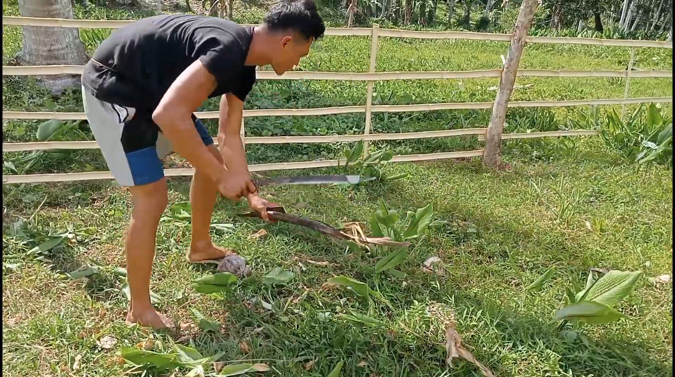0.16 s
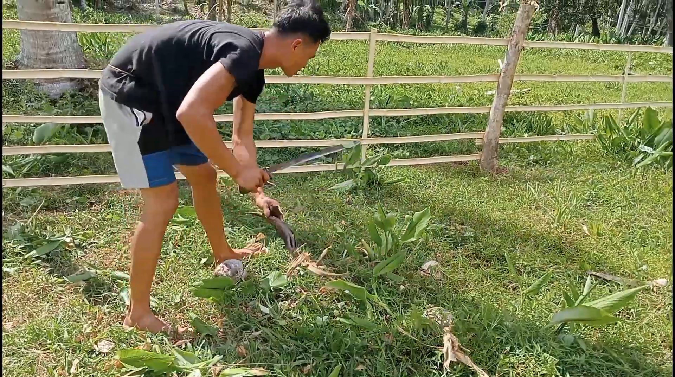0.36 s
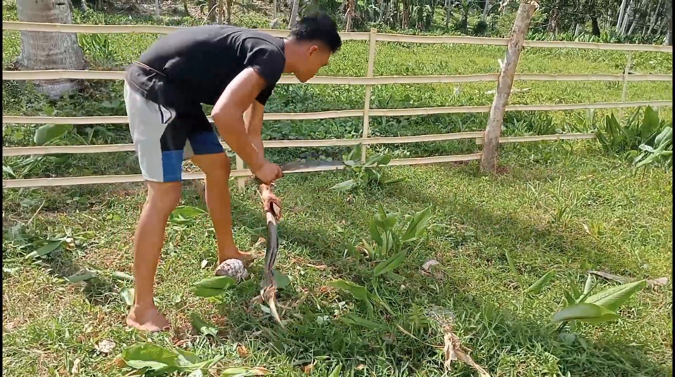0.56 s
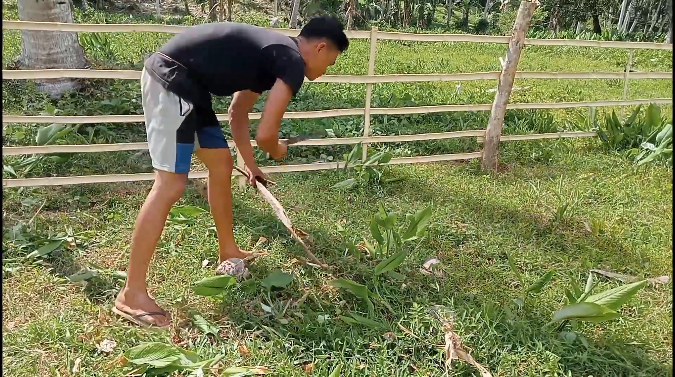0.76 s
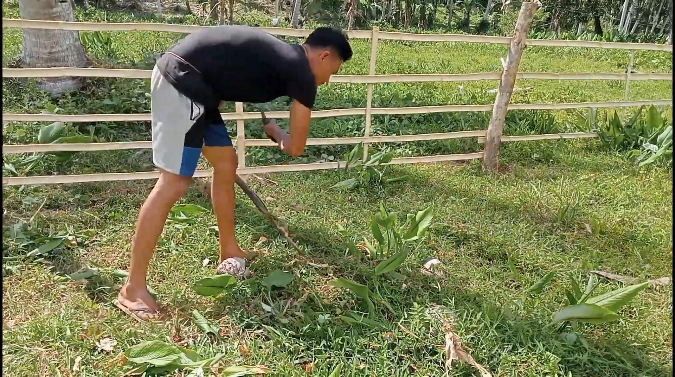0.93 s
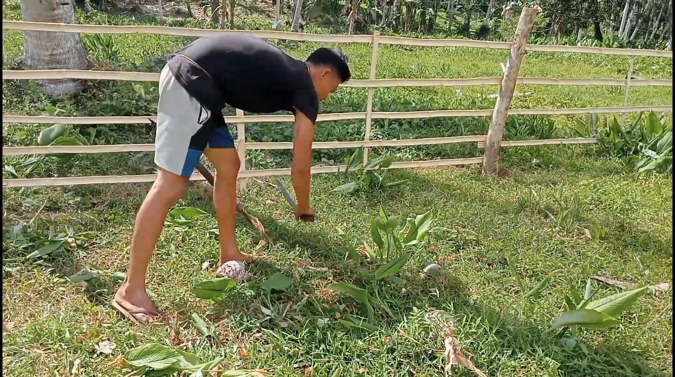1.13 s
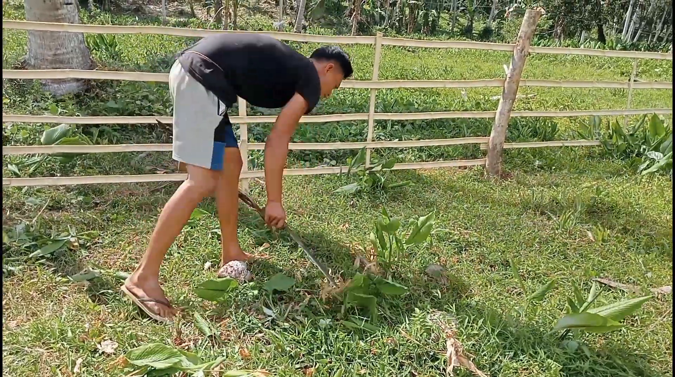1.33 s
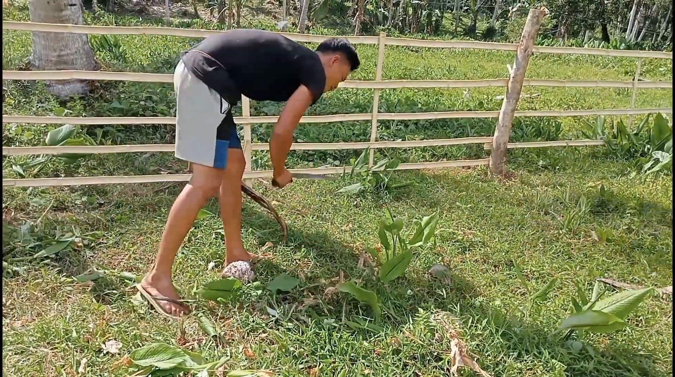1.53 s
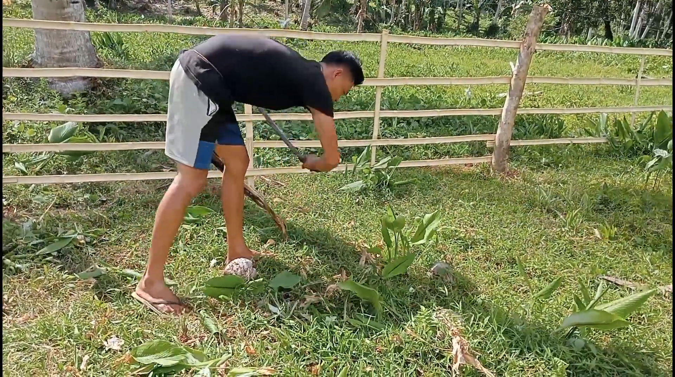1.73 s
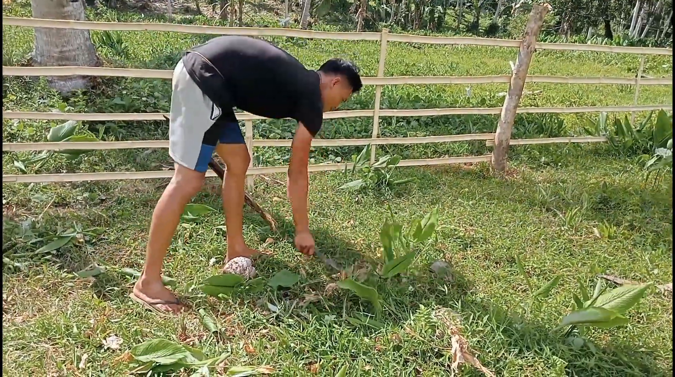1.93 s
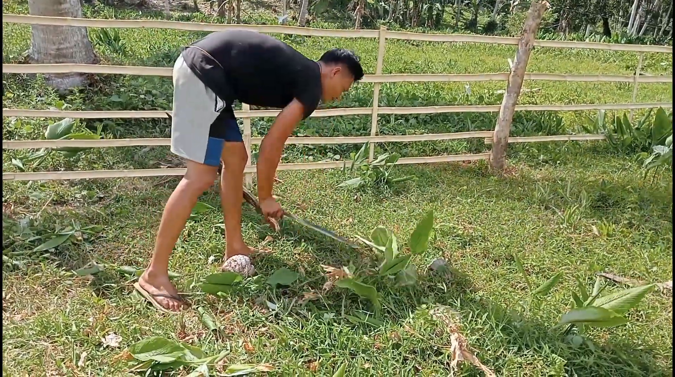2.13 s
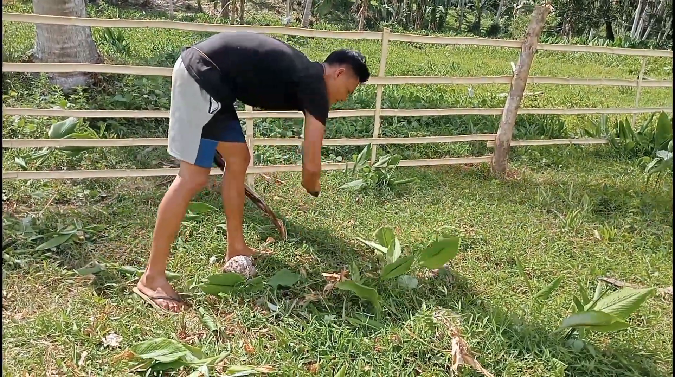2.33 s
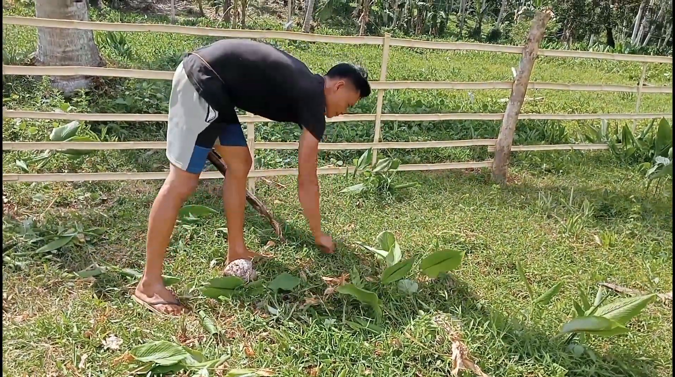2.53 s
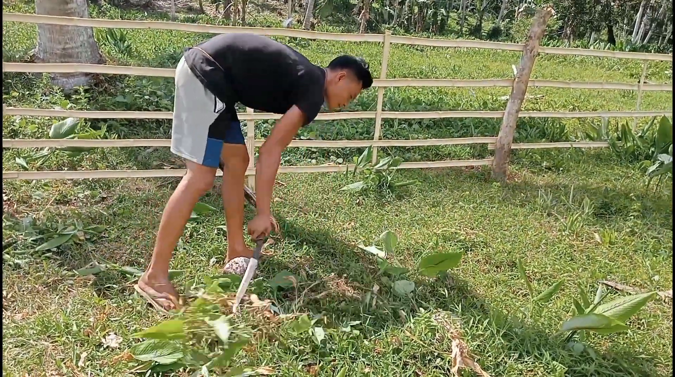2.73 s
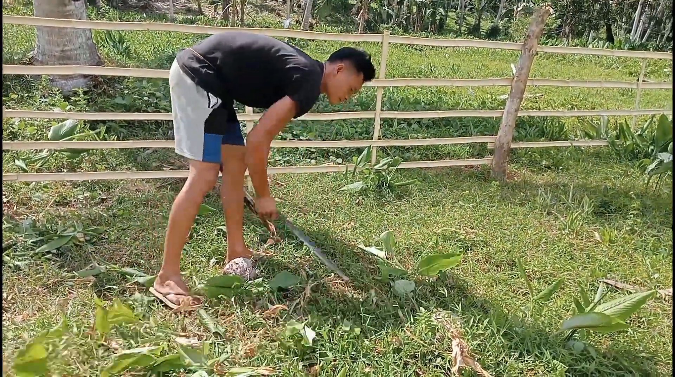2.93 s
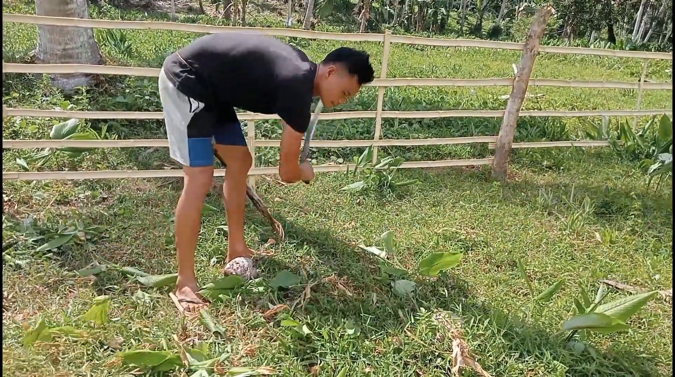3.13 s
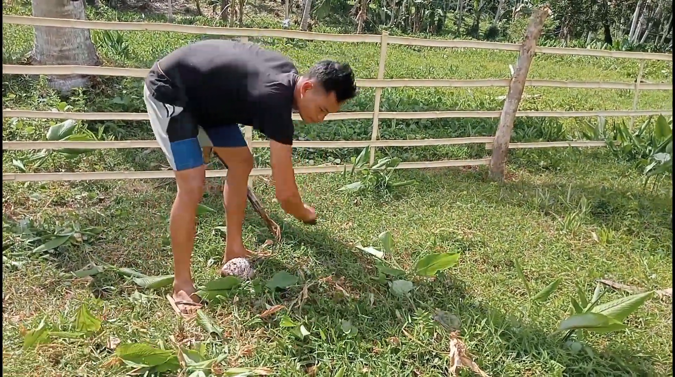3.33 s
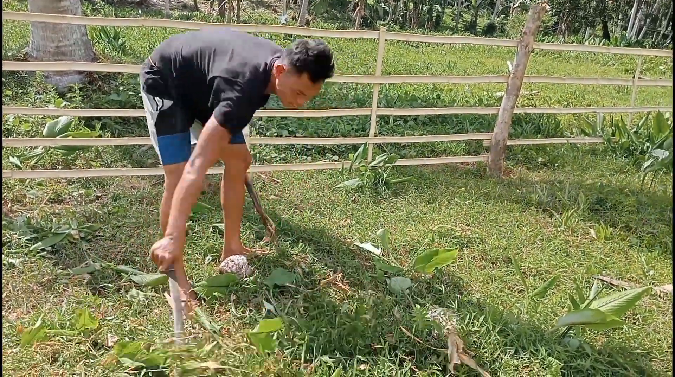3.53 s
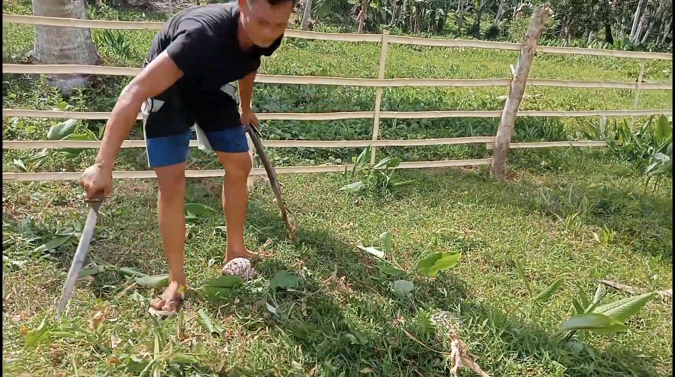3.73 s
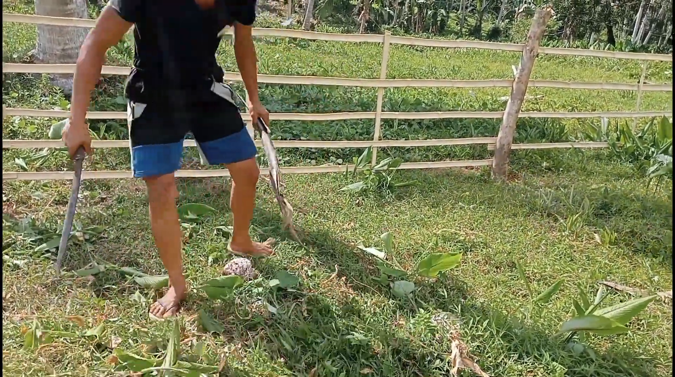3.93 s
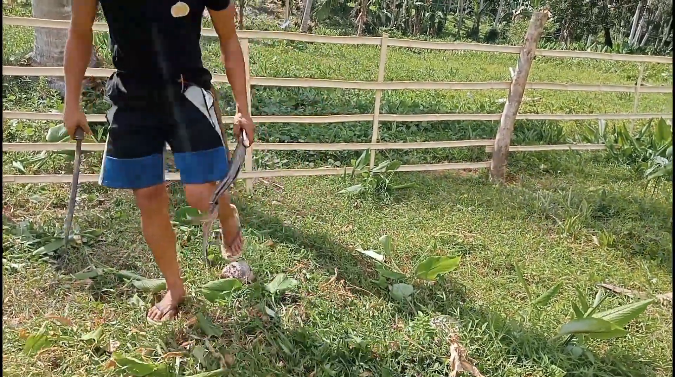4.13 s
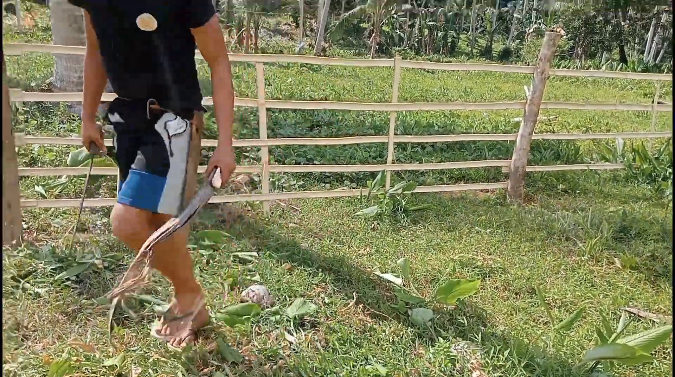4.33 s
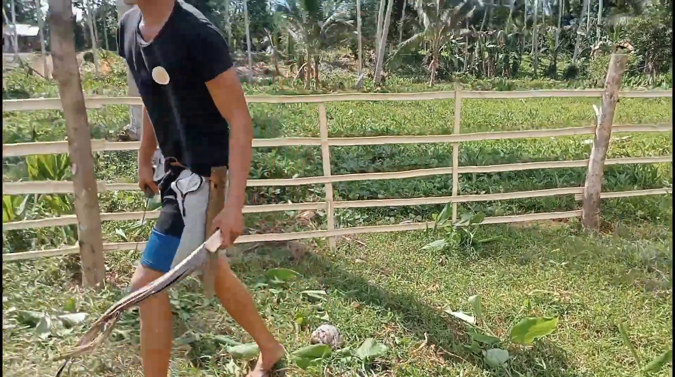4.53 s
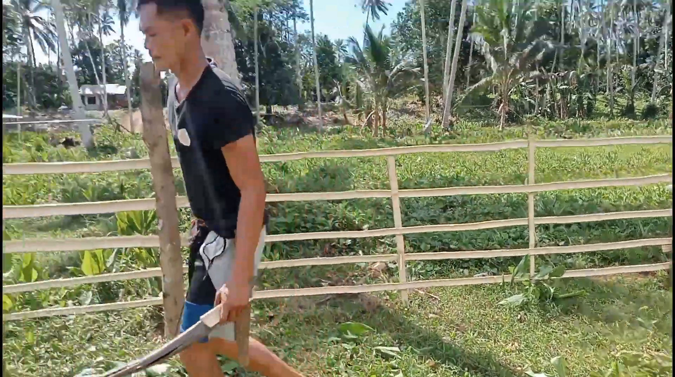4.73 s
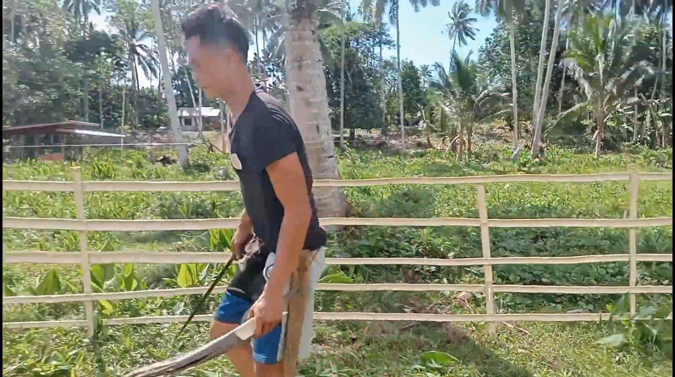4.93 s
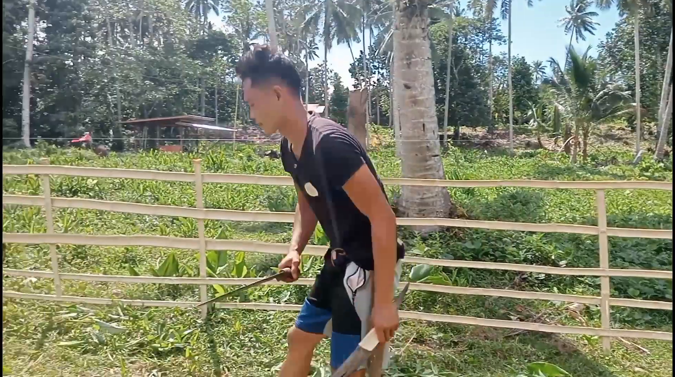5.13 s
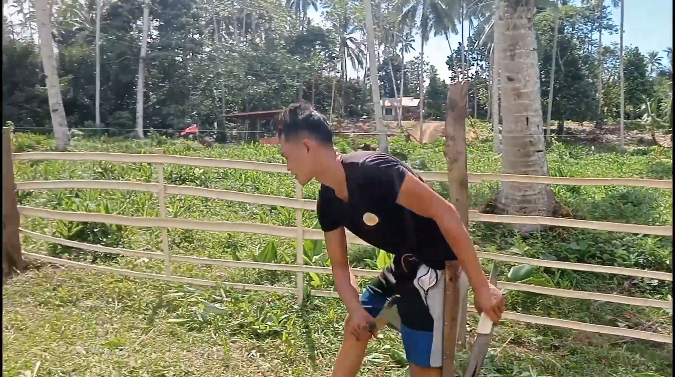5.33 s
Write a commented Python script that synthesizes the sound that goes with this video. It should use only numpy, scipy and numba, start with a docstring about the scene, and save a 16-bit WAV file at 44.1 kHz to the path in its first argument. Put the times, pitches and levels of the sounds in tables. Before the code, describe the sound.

Outdoors in an open grassy field, a phone microphone close by is buffeted by low wind. After light rustles and twig snaps, a bush knife slashes weeds three times, loud and crisp, with cut leaves pattering down. The blade tinks twice faintly, a fourth slash follows, then quieter snaps and leafy steps. Thin birds whistle far off and foliage hisses.

```python
"""Wind buffets a nearby microphone, foliage hisses, leaves stir and small birds whistle faintly throughout.
Twigs snap, then a long bush knife slashes weeds near 1.3, 2.1 and 2.7 s; its blade tinks twice near 3 s.
A fourth slash comes near 3.6 s, followed by more snaps. Cut leaves rustle down after every swing.
Noise bursts make tearing, snaps and thuds; sines make tinks and birds; crackle makes the leaves;
low-passed noise and pressure dips make the wind; coloured noise makes the far foliage."""
import sys
import numpy as np
from scipy import signal
from scipy.fft import rfft, irfft
from scipy.io import wavfile
from scipy.ndimage import uniform_filter1d
from numba import njit

SR = 44100
rng = np.random.default_rng(int(sys.argv[2]) if len(sys.argv) > 2 else 0)


def volts(x):
    """Linear amplitude factor 10**(x/20) for a level x in dB, scalar or array-like."""
    e = np.asarray(x, float) / 20
    return 10 ** e


def file_out(sig):
    """Save sig as 16-bit WAV at sys.argv[1]."""
    # one column per channel
    cols = np.atleast_2d(sig).T
    # limit, then scale
    lim = np.clip(cols, -1, 1)
    pcm = np.round(lim * 32767).astype(np.int16)
    wavfile.write(sys.argv[1], SR, pcm)


N = 237431
T = np.arange(N) / SR


# stems torn by the blade: start_s, level_db, tilt_db_per_octave, ring_hz, thud_db (against the tearing), t60_s
STEM_CUTS = [(1.3435, -16, 0.2, 4960, -33, 0.34), (1.354, -4.5, 2.2, 7000, -26, 0.087),
             (1.358, -3, 2.5, 5030, -22.5, 0.082), (1.3663, -4, 3.5, 9400, -13.5, 0.11),
             (1.401, -16, -1, 3280, -17, 0.17), (2.0853, -14, 2, 4020, -32, 0.11),
             (2.0912, -2, 1.5, 7600, -28, 0.049), (2.0963, -2, -0.5, 4930, -19.5, 0.038),
             (2.102, -10.5, 4.5, 4970, -30, 0.19), (2.7405, -18, -3, 5400, -11, 0.56),
             (2.7506, -1.5, -1.3, 3470, -21, 0.042), (2.755, -10, 7, 4500, -20, 0.044),
             (2.766, -6.5, 7, 8550, -12, 0.24), (2.771, -10, -1, 2000, -22, 0.19),
             (2.7797, -3.5, 0, 3900, -15, 0.074), (2.7883, -9, -4.5, 3000, -19, 0.092),
             (2.797, -11, 2.3, 1510, -9, 0.21), (3.588, -12, 1, 9000, -41, .05),
             (3.5907, -7.5, -0.3, 12400, -17, 0.21), (3.6065, -4.5, -1.5, 8900, -8.5, 0.12),
             (3.616, -5.5, 7, 9000, -21, 0.13), (3.623, -10.5, -1, 5000, -8, 0.15),
             (3.644, -20.5, .6, 5030, -5.5, 0.1)]
# colour of tearing fibres: pitch_hz, level_db (per Hz)
TEARING_COLOUR = [(290, -19), (500, -14), (988, -8), (1400, 2), (1720, -14.5), (1980, 0), (2980, -1),
                  (3440, 1), (9220, -1), (12500, -6), (14900, -4.5), (16000, -1.5)]
# thud of a thick stem: pitch_hz, width_hz, level_db
STEM_MODES = [(264, 150, -2), (380, 140, 8.5), (730, 210, 7.5), (1350, 370, 0), (1900, 220, -1)]
# bending modes of the blade, also played by tinks(): pitch_hz, level_db, t60_s
BLADE_MODES = [(3350, -23, 0.024), (4180, -6.5, 0.027), (4760, -3, 0.067), (5870, -21, 0.016),
               (6790, 1, 0.04), (7860, 3.5, 0.04), (8800, 4.5, 0.019), (9730, -6, 0.023)]


def slashes():
    """Each cut is a burst of tearing fibres, ringing round one pitch, over the short thud of the stem."""
    out, t = np.zeros(N), T[:SR // 4]
    rise = 1 - np.exp(-t / 0.00072)
    for start_s, level_db, tilt_db, ring_hz, thud_db, t60_s in STEM_CUTS:
        grains = crackle(len(t), spread_db=2.5)
        fibres = colour(grains, TEARING_COLOUR, tilt_db)
        fibres = fibres + 1.4 * band(fibres, ring_hz, 0.3 * ring_hz)
        fibres = patchy(fibres, 400, spread_db=1.3)
        # the tearing shakes the blade, which colours the burst with its own modes
        shaken_blade = sum(band(fibres, hz, 8 / blade_t60_s) for hz, _, blade_t60_s in BLADE_MODES)
        fibres = unit(fibres + 0.17 * shaken_blade)
        tearing = fibres * volts(-60 * t / t60_s) / 3
        blow = grains * volts(-60 * t / 0.054)
        thud = sum(volts(mode_db) * band(blow, hz, width_hz) for hz, width_hz, mode_db in STEM_MODES)
        thud = volts(thud_db) * thud / np.abs(thud).max()
        add(out, start_s, volts(level_db) * rise * (tearing + thud))
    return out


# blade touched: start_s, peak_db, tilt_db_per_octave
BLADE_TOUCHES = [(2.9485, -26, -5), (3.045, -13.5, 12)]


def tinks():
    """The hand-held blade rings briefly on its bending modes."""
    out, t = np.zeros(N), T[:SR // 10]
    for start_s, peak_db, tilt_db in BLADE_TOUCHES:
        ring = 0
        for hz, mode_db, t60_s in BLADE_MODES:
            tilted_db = mode_db + tilt_db * np.log2(hz / 8000)
            ring = ring + volts(tilted_db - 60 * t / t60_s) * np.sin(2 * np.pi * hz * t)
        add(out, start_s, volts(peak_db) * ring / np.abs(ring).max())
    return out


# colour of the leaves: pitch_hz, level_db (per Hz)
LEAF_COLOUR = [(410, -38), (700, -4), (910, -8), (1330, -2.5), (1820, -7.5), (2490, -4), (6650, -3.5),
               (15000, -10.5), (16000, -3)]
# leaves and grass stirred or trodden: start_s, length_s, level_db, treble_db (added above 4 kHz, taken below)
LEAF_STIRS = [(0.01, 0.12, -58, 4), (0.166, 0.093, -52.5, -4.5), (0.395, 0.16, -52.5, -0.5),
              (0.528, 0.024, -46.5, -2.5), (.67, .03, -44.5, -2.5), (0.854, .06, -49, .6),
              (.94, 0.043, -46, 1.5), (1.103, 0.17, -51, -4.5), (1.87, 0.054, -48.5, -2),
              (2.02, 0.017, -48, -5), (2.36, 0.076, -45.5, -4.5), (2.64, 0.037, -59, -12),
              (2.968, 0.14, -42, 1.2), (3.144, 0.073, -47.5, .6), (3.256, 0.045, -51, -5.5),
              (3.395, .07, -54, -8), (3.885, 0.15, -45.5, -0.5), (4.097, 0.079, -45.5, -0.5),
              (4.286, 0.025, -45.5, -2.5), (4.624, 0.09, -41, 0.6), (4.924, .07, -49.5, -0.5),
              (5.235, 0.065, -51, 2.5)]
# cut leaves falling after each swing: start_s, level_db, t60_s, treble_db (added above 4 kHz, taken below)
LEAF_FALLS = [(1.4, -32, 0.61, .3), (2.12, -31.5, .3, 2), (2.81, -34, 0.68, 0), (3.65, -38, 0.99, 2.5)]


def rustle():
    """Patchy crackle of many leaves, swelling when they are stirred and dying away as cut ones fall."""
    rise_db_per_s, fade_db_per_s, still_db = 402, 210, -57.5
    # single leaves crack above the rustle
    fleck_shape = volts(3.5 - 60 * T[:SR // 20] / 0.0094)
    flecks = signal.fftconvolve(scatter(90, spread_db=7), fleck_shape)[:N]
    grains = crackle(N, spread_db=3.0) * (volts(0.43 * walk(200)) + flecks)
    leaves = patchy(colour(grains, LEAF_COLOUR), 70, spread_db=2.5)
    low = signal.sosfilt(signal.butter(2, 4000, fs=SR, output="sos"), leaves)
    high = leaves - low

    moves = [(still_db + 2.5 * walk(16), 0)]
    for start_s, length_s, level_db, treble_db in LEAF_STIRS:
        moves.append((held_db(start_s, length_s, level_db, rise_db_per_s, fade_db_per_s), treble_db))
    for start_s, level_db, t60_s, treble_db in LEAF_FALLS:
        moves.append((held_db(start_s, 0, level_db, rise_db_per_s, 60 / t60_s), treble_db))

    def gain(sign):
        """Add the powers of all movements, for the low (-1) or high (1) half."""
        return np.sqrt(sum(volts(2 * (db + sign * treble_db)) for db, treble_db in moves))

    return low * gain(-1) + high * gain(1)


# twig snaps: start_s, peak_db, pitch_hz (centre)
TWIG_SNAPS = [(0.6559, -33, 6900), (0.6802, -18, 8700), (0.688, -28, 8300), (1.7913, -33, 5170),
              (2.0291, -27, 9500), (2.383, -25, 9000), (3.6687, -26, 9480), (3.8877, -27, 1700),
              (3.932, -31, 3410), (3.9918, -30, 5990), (4.1322, -30.5, 1980), (4.2377, -24.5, 7030),
              (4.2869, -19.5, 5730), (4.3105, -24.5, 9820), (4.927, -29.5, 2410), (4.938, -35, 2100),
              (4.9941, -28.5, 6500), (5.0064, -35, 5020)]


def snaps():
    """A click, its bounce off the ground and a few after-crackles, heard through a broad resonance."""
    out, t = np.zeros(N), T[:SR // 10]
    for start_s, peak_db, hz in TWIG_SNAPS:
        burst = 0.16 * rng.standard_normal(len(t)) * volts(-60 * t / 0.015)
        burst[0] = 1
        burst[int(.001 * SR)] = -.4  # the bounce
        snap = band(band(burst, hz, 1.15 * hz), hz, 1.0 * hz)
        add(out, start_s, volts(peak_db) * snap / np.abs(snap).max())
    return out


# gusts at the microphone: start_s, length_s, level_db
WIND_GUSTS = [(0.055, 0.065, -35), (0.158, 0.051, -31.5), (0.343, .21, -26.5), (0.681, 0.18, -31),
              (1.04, 0.063, -28), (1.216, 0.11, -33.5), (1.394, 0.062, -31), (1.561, 0.083, -25),
              (1.792, .12, -28.5), (1.93, .11, -33.5), (2.168, 0.13, -28), (2.404, 0.023, -31.5),
              (2.537, 0.048, -29), (2.604, 0.061, -33.5), (2.864, 0.12, -30.5), (3.122, 0.22, -31.5),
              (3.536, 0.024, -34.5), (3.794, .18, -37.5), (4.118, 0.14, -35), (4.538, 0.027, -38),
              (4.694, 0.088, -41.5), (5.008, 0.24, -36.5)]
# breeze between gusts: time_s, level_db
BREEZE = [(0, -38.5), (2.8, -36.5), (3.6, -45.5), (5.38, -46.5)]
# suction thumps at set times: time_s (lowest pressure), depth_db, width_ms
SUCTION_THUMPS = [(0.31, -14.5, 4.5), (0.352, -9.5, 1.57), (0.374, -8, 2.9), (0.431, -19, 3.4),
                  (0.447, -19, 2.8), (0.497, -14.5, 3.6), (1.125, -19, 4.1), (1.29, -16.5, 2.36),
                  (1.575, -31, 2.5), (1.591, -8.5, 2.13), (1.635, -14, 2.15), (1.845, -13.5, 5.1),
                  (1.875, -18.5, 4.3), (2.039, -15.5, 3.5), (2.216, -22, 1.6), (2.257, -18, 1.83),
                  (2.433, -18, 3.3), (2.543, -13.5, 2.75), (3.169, -18.5, 3.2), (3.225, -19, 2.5),
                  (3.271, -17, 3), (3.96, -18.5, 4.7), (4.536, -21, 2.84), (5.175, -16.5, 5.6),
                  (5.229, -19.5, 4.9), (5.26, -24, 4.6)]


def wind():
    """Eddies suck at the port with the square of their speed; faster gusts carry smaller, brighter eddies."""
    rise_db_per_s, fade_db_per_s = 254, 200
    gusts = [held_db(*gust, rise_db_per_s, fade_db_per_s) for gust in WIND_GUSTS]
    breeze = np.interp(T, *np.transpose(BREEZE))
    gust_db = np.max(gusts + [breeze], axis=0)
    edge_hz = np.clip(115 * volts(0.29 * (gust_db + 41)), 30, 600)
    speed = glide_low(glide_low(rng.standard_normal(N), edge_hz), edge_hz)
    speed = unit(speed / np.sqrt(edge_hz))  # evens out the power as the edge moves
    eddies = unit(speed - 0.21 * speed ** 2) * volts(gust_db + 3.27 * walk(30))
    # random buffets follow the level of the gust
    buffets = scatter(25, spread_db=6) * volts(gust_db + 4.5)
    eddies += signal.fftconvolve(buffets, dip(3.47), "same")
    for time_s, depth_db, width_ms in SUCTION_THUMPS:
        add(eddies, time_s - .02, volts(depth_db) * dip(width_ms))
    return eddies


# whistles: start_s, end_s, start_hz, end_hz, level_db (rms, before fades and flicker)
BIRD_WHISTLES = [(0, .1, 5250, 5650, -61), (.53, 0.754, 5140, 5760, -62), (0.539, .61, 4320, 4600, -56),
                 (.77, 0.903, 4920, 5950, -60), (1.238, 1.35, 4400, 5490, -59.5),
                 (2.634, 2.673, 2600, 2470, -52), (3.2, 3.229, 2240, 1980, -47),
                 (3.228, 3.249, 1830, 1720, -51.5), (3.398, 3.43, 2225, 1850, -47.5),
                 (3.43, 3.455, 1790, 1750, -49), (3.41, 3.528, 5070, 5444, -57.5),
                 (4.021, 4.266, 4310, 6120, -57), (4.48, 4.6, 4800, 5870, -62)]


def birds():
    """Thin gliding whistles from the trees, trembling in pitch and broken up by the moving air."""
    out, tremble = np.zeros(N), 1 + .008 * walk(150)
    for start_s, end_s, start_hz, end_hz, level_db in BIRD_WHISTLES:
        hz = np.linspace(start_hz, end_hz, int((end_s - start_s) * SR))
        hz = hz * tremble[int(start_s * SR):][:len(hz)]
        whistle = np.sqrt(2) * np.sin(2 * np.pi * np.cumsum(hz) / SR)
        fades = signal.windows.tukey(len(hz), .5)
        add(out, start_s, volts(level_db) * fades * whistle)
    return out * volts(3.5 * walk(90))


# colour of distant foliage: pitch_hz, level_db (per Hz)
FOLIAGE_COLOUR = [(180, -12), (300, -2), (603, -4), (1170, -5), (2980, -6.5), (3580, -6), (5340, -7),
                  (7570, -12.5), (8940, -11), (12100, -27.5), (15000, -25), (16000, -34)]


def field():
    """Hiss of distant foliage, stirring a little band by band."""
    hiss = colour(rng.standard_normal(N), FOLIAGE_COLOUR)
    return patchy(hiss, 12, spread_db=1.7) * volts(-49.5)


def unit(x):
    """Scale to rms 1."""
    return x / np.sqrt(np.mean(x ** 2) + 1e-18)


def colour(x, points, tilt_db=0.):
    """Shape a spectrum by (Hz, dB) points, tilted about 4 kHz in dB per octave, and scale to rms 1."""
    octave = np.log2(np.maximum(np.fft.rfftfreq(len(x), 1 / SR), 20))
    hz, db = np.transpose(points)
    gain_db = np.interp(octave, np.log2(hz), db) + tilt_db * (octave - np.log2(4000))
    return unit(irfft(rfft(x) * volts(gain_db), len(x)))


def band(x, hz, width):
    """Two-pole resonance."""
    return signal.lfilter(*signal.iirpeak(min(hz, .4 * SR), hz / width, fs=SR), x)


def patchy(x, rate, spread_db):
    """Let every two-thirds octave flicker on its own, as separate fibres and leaves do."""
    spectrum, octave = rfft(x), np.log2(np.fft.rfftfreq(len(x), 1 / SR) + 1)
    out = 0
    for centre in np.arange(8, 15, 2 / 3):
        share = np.clip(1 - np.abs(octave - centre) * 3 / 2, 0, 1)  # overlapping triangles
        out = out + irfft(spectrum * share, len(x)) * volts(spread_db * walk(rate, size=len(x)))
    return unit(out)


def walk(rate, size=N):
    """Random levels held 1 / rate s and smoothed twice; spread near 1."""
    k = max(int(SR / rate), 2)
    steps = np.repeat(rng.standard_normal(size // k + 1), k)
    return unit(uniform_filter1d(uniform_filter1d(steps, k), k)[:size])


def crackle(size, spread_db):
    """Dense tiny breaks, a few much louder than the rest."""
    chance = rng.random((2, size))
    return np.sign(chance[0] - .5) * volts(-spread_db * np.log(chance[1] + 1e-4))


def scatter(per_s, spread_db):
    """Sparse impulses of uneven size."""
    chance = rng.random((2, N))
    return (chance[0] < per_s / SR) * volts(spread_db * (2 * chance[1] - 1.5))


def held_db(start, length, db, rise_db_per_s, fade_db_per_s):
    """Level that climbs steadily, holds, then sinks."""
    before_s, after_s = np.maximum(start - T, 0), np.maximum(T - start - length, 0)
    return db - rise_db_per_s * before_s - fade_db_per_s * after_s


def dip(width_ms):
    """A sharp fall of pressure between two soft shoulders, centred at 20 ms."""
    ms = (T[:SR // 25] - .02) * 1000
    x = (ms / (0.75 * width_ms)) ** 2
    return (0.84 * x - 1) / (1 + 0.7 * x) ** 2.06


@njit
def glide_low(x, hz):
    """State-variable low-pass whose edge moves every sample."""
    y, b, l = np.empty(len(x)), 0., 0.
    for i in range(len(x)):
        g = np.tan(np.pi * hz[i] / SR)
        v = (b + g * (x[i] - l)) / (1 + g * (g + 1.4))
        low = l + g * v
        b, l, y[i] = 2 * v - b, 2 * low - l, low
    return y


def add(out, s, sound):
    """Mix a short sound in at time s."""
    i = int(s * SR)
    out[i:i + len(sound)] += sound[:N - i]


def scene():
    """Sum all sources in the open air: no walls answer."""
    near = slashes() + rustle() + snaps() + tinks()
    return (near + birds() + wind() + field())[None]


def top_cut(x):
    """Nothing passes above the cut-off."""
    return signal.sosfilt(signal.butter(12, 16660, fs=SR, output="sos"), x)


def record(dry):
    """The phone filters out deep bass without smearing it, its port rings near 9 kHz, the very top is cut."""
    x = signal.sosfiltfilt(signal.butter(2, 63, "high", fs=SR, output="sos"), dry)
    x = x + 0.32 * band(x, 9200, 1340)
    x = signal.sosfilt(signal.ellip(8, .2, 60, 15600, fs=SR, output="sos"), x)
    return top_cut(x)


dry = scene()
out = record(dry)
file_out(out)
```